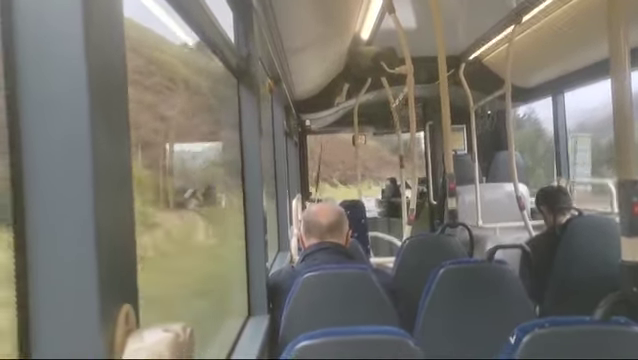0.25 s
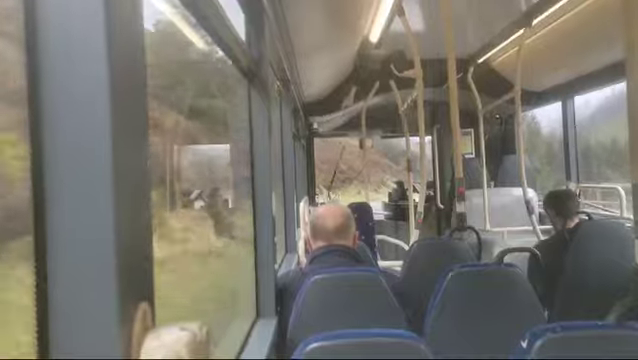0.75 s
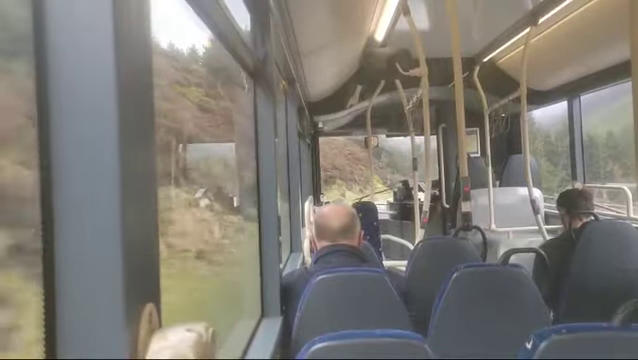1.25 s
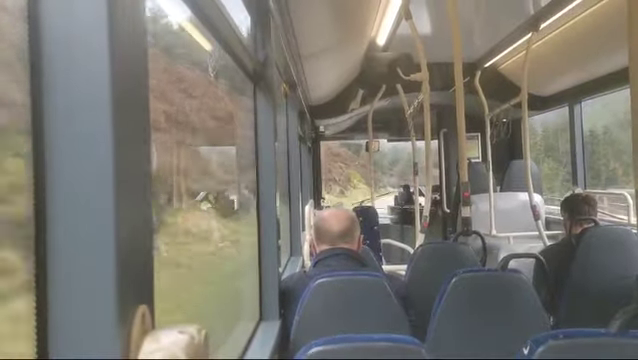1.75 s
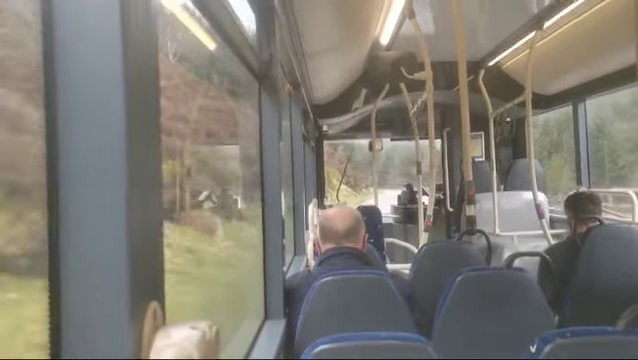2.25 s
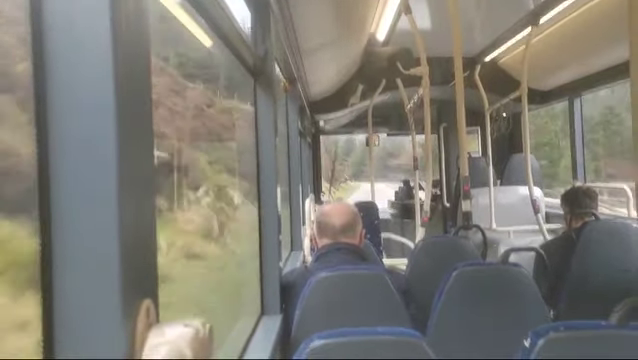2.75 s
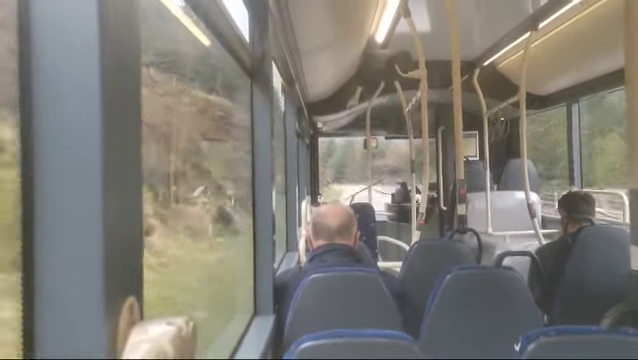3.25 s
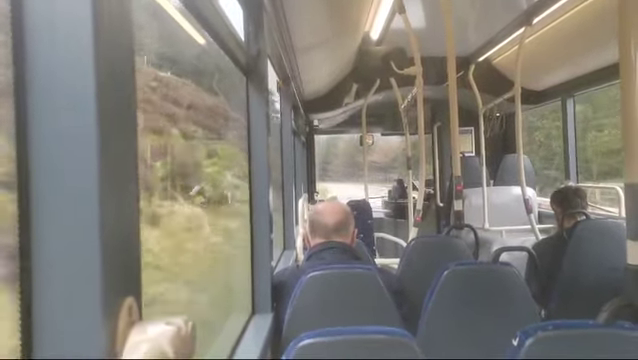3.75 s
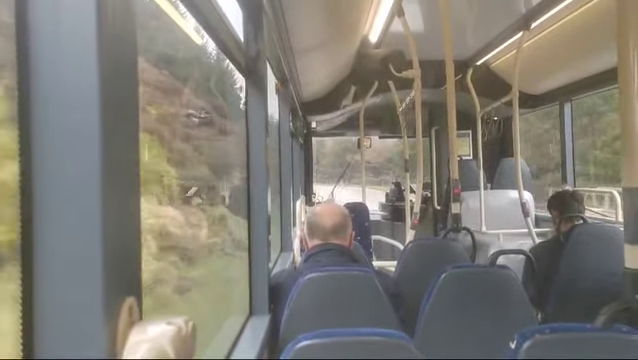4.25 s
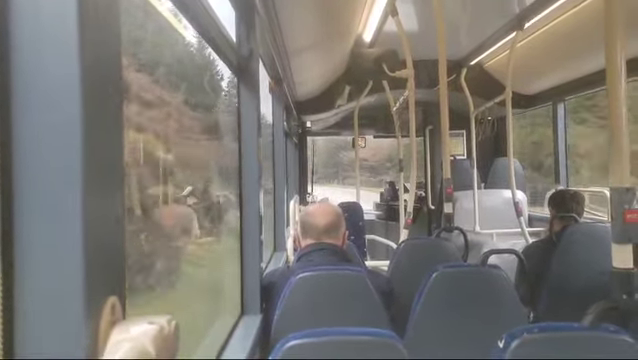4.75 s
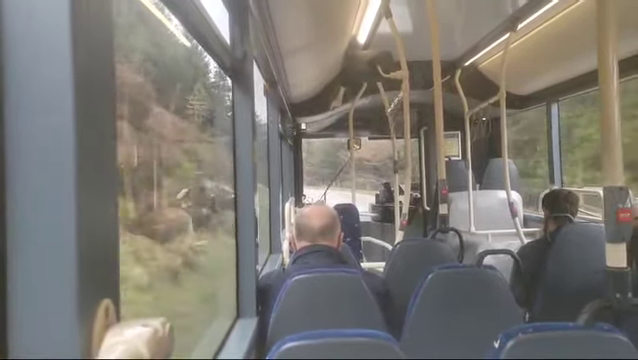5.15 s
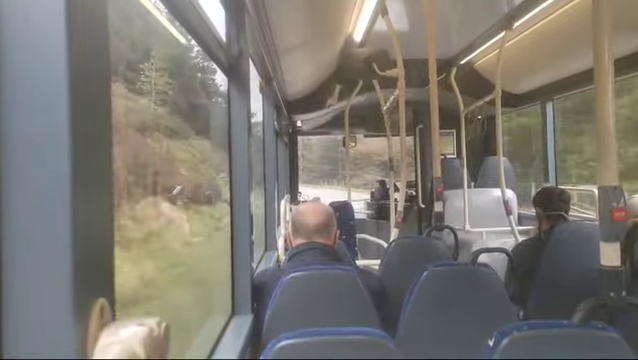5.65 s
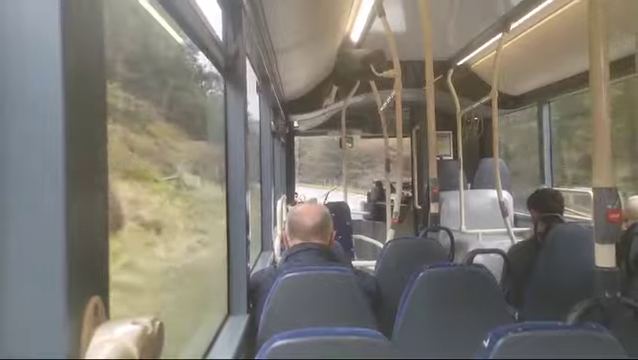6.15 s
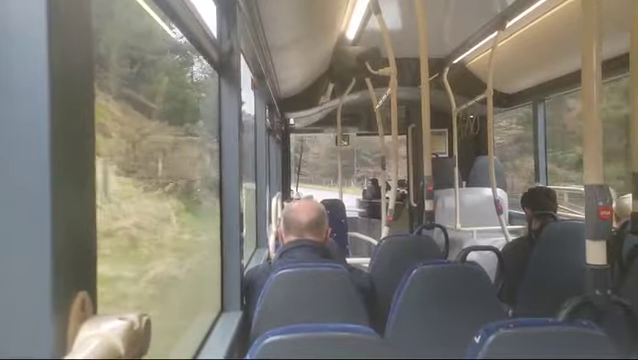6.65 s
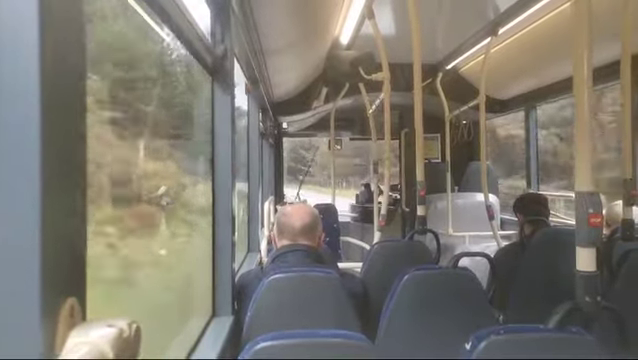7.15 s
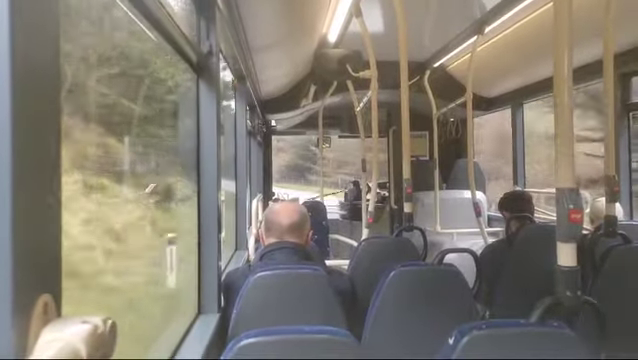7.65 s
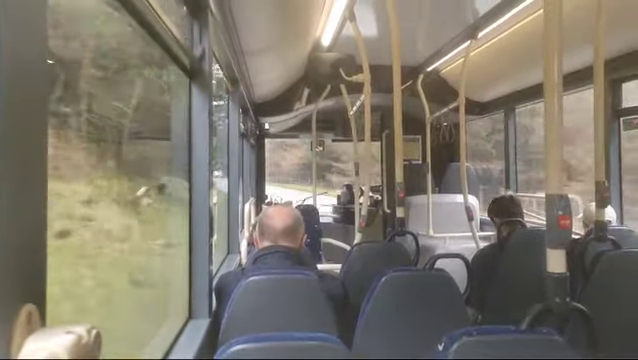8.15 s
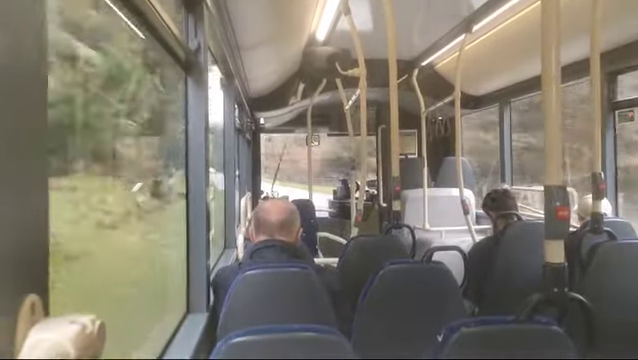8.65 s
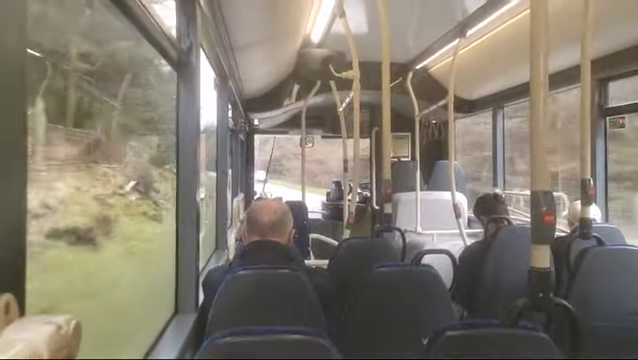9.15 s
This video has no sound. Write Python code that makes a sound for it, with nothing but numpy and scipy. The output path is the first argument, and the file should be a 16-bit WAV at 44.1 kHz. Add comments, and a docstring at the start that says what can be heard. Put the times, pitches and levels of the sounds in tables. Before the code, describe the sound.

Stereo cabin sound of a bus accelerating on a hill road. Nearly a second of rough tarmac jolts the floor, throws grit and stones at the wheel arches and shakes loose fittings. Then smoother rumble, soft hiss and drone, a faint whistle sweeping up near three seconds, and slowly rising hum and thin whine, with occasional plastic taps, body thuds and late rattles.

```python
"""Inside a bus gathering speed on a hill road, heard as filtered noise, gliding tones and decaying modes.
A rough patch at the start throws stones and grit at the wheel arches and sets the fittings rattling.
The throttle eases, the high gear bites briefly, then load returns: the turbocharger whistles up, the intake opens.
On a level stretch the body shakes less and the engine's boom stands clear; later come trim taps and more knocks.
Throughout, noise follows speed, load and road, and engine and gear tones rise through cabin resonances."""
import sys
import numpy as np
from scipy import signal
from scipy.fft import rfft, irfft
from scipy.io import wavfile
from scipy.ndimage import uniform_filter1d

SR = 44100
rng = np.random.default_rng(int(sys.argv[2]) if len(sys.argv) > 2 else 0)


def dump(signal):
    """Clip the signal to [-1, 1] and save it as 16-bit WAV at the path in sys.argv[1]."""
    limited = np.clip(np.atleast_2d(signal).T, -1, 1)
    pcm = np.round(limited * 32767).astype(np.int16)
    wavfile.write(sys.argv[1], SR, pcm)


N = 414540
TIME = np.arange(N) / SR
BINS = np.maximum(np.arange(N // 2 + 1) * SR / N, 1)  # Hz

# Noise laws: (dB at cruise, dB per doubling of speed, dB per dB of load, dB per dB of road roughness)
HEAVE_LAW = (-28.5, 12, 0.3, 1)
FLOOR_LAW = (-18, 9, 0.8, 0.86)
WALL_LAW = (-26.5, 8, 0.5, 0.91)
# Resonances of the heaving body, the floor and the side walls.
# Columns: centre_hz, width_hz (between points 3 dB down), relative_level_db
BODY_RESONANCES = [(30, 16, -15), (43.4, 7.9, -3), (63.6, 6.7, -6.5)]
FLOOR_RESONANCES = [(69.5, 18, 2.5), (94.4, 17, 2.5), (110, 14, -8), (129.4, 28.3, -3)]
WALL_RESONANCES = [(159, 21, -3), (183, 18.6, -1.5), (241.7, 21, -10.5)]
# Dips and humps in the road. Columns: start_s, length_s, heave_level_db, floor_thud_level_db (while fully risen)
ROAD_BUMPS = [(0, 0.55, -23.5, -17.5), (0.597, 0.1, -26, -15.5), (2.1, 0.59, -28.5, -24),
              (2.75, .6, -23.5, -21), (5.455, .2, -32.5, -24.5), (7.5, 0.16, -46, -19),
              (8.548, .9, -26, -32)]
BUMP_ATTACK_S, BUMP_DECAY_S = 0.14, 0.2
# Stretch where the body shakes less: middle_s, length_s, change_db
LEVEL_STRETCH = (4.45, 1.72, -3)


def body_rumble(drive, wheel):
    """Forced vibration: road noise excites body, floor and walls; floor and walls swell once a wheel turn."""
    heave_bumps = [(s, length, heave_db) for s, length, heave_db, _ in ROAD_BUMPS]
    thud_bumps = [(s, length, thud_db) for s, length, _, thud_db in ROAD_BUMPS]
    heave_bump_gain = swells(heave_bumps, BUMP_ATTACK_S, BUMP_DECAY_S)
    thud_bump_gain = swells(thud_bumps, BUMP_ATTACK_S, BUMP_DECAY_S)

    heave_gain = np.hypot(undb(driven(HEAVE_LAW, drive)), heave_bump_gain)
    floor_gain = np.hypot(undb(driven(FLOOR_LAW, drive) + 1.0 * wheel), thud_bump_gain)
    wall_gain = undb(driven(WALL_LAW, drive) + 0.39 * wheel)

    heave = heave_gain * even(cabin_noise(resonances(BODY_RESONANCES)))
    floor = floor_gain * even(cabin_noise(resonances(FLOOR_RESONANCES)))
    walls = wall_gain * even(cabin_noise(resonances(WALL_RESONANCES)))
    return undb(stretch(*LEVEL_STRETCH)) * (heave + floor + walls)


# Wheels dropping into dips. Columns: start_s, heave_level_db, floor_thud_level_db (before rise and decay)
WHEEL_THUMPS = [(.265, -31, -12), (0.361, -7.5, -17), (.44, -23, -6.5), (.685, -22, -13),
                (2.216, -25.5, -17.5), (3.151, -8.5, -19), (6.851, -13, -26.5), (7.553, -30, -10)]
# Growth and decay of a thump: rise_s, t60_s
HEAVE_THUMP, FLOOR_THUMP = (0.033, 0.4), (0.015, 0.22)


def thumps():
    """Impulse response: a dip knocks body and floor into their lowest modes, alike at both microphones."""
    out, t = np.zeros(N), TIME[:SR // 2]
    for s, heave_db, thud_db in WHEEL_THUMPS:
        start = int(s * SR)
        parts = (
            (heave_db, BODY_RESONANCES, HEAVE_THUMP),
            (thud_db, FLOOR_RESONANCES, FLOOR_THUMP),
        )
        for db, modes, (rise_s, t60) in parts:
            swing = sum(undb(mode_db) * np.sin(2 * np.pi * (hz * t + rng.random())) for hz, _, mode_db in modes)
            gain = undb(db - 60 * t / t60) * np.minimum(t / rise_s, 1)
            out[start:start + len(t)] += gain * swing
    return out


PANEL_LAW = (-32.5, 6, 0.6, 1)
# Spectrum of the panels. Columns: frequency_hz, relative_density_db
PANEL_SPECTRUM = [(120, -27.5), (200, 5), (270, -2.5), (350, -1.5), (430, -6), (520, -12.5), (700, -16),
                  (1100, -41), (2500, -74.5)]


def panel_noise(drive):
    """Structure-borne sound: the road shakes the panels into broadband noise of wandering level."""
    return undb(driven(PANEL_LAW, drive) + 1.3 * walk(8.1)) * cabin_noise(colour(PANEL_SPECTRUM))


# Engine boom, engine drone, low and high gear whine. Column: order_cycles_per_crank_turn
MAIN_ORDERS = [4, 9, 17.14, 27]
# Cabin resonances each main tone glides through.
# Columns: centre_hz, width_hz (between points 6 dB down), peak_level_db
BOOM_RESONANCES = [(60.9, 1.5, -17.3), (62.2, 1.4, -15.8), (63.2, 1.2, -15.3), (64.8, 2, -11.8),
                   (66.1, 1.2, -16), (72.7, 1, -20)]
DRONE_RESONANCES = [(132, 5.8, -22.5), (135.7, 5.9, -19), (149.7, 8.6, -24)]
LOW_GEAR_RESONANCES = [(240.5, 9, -18), (247, 6, -28), (251.5, 4.5, -30)]
HIGH_GEAR_RESONANCES = [(375.4, 11, -33.2), (390, 6.5, -29), (394.3, 7, -30), (411.3, 8.6, -38),
                        (443, 20, -30), (457, 16, -37), (471, 16, -35.5), (484, 10, -40.5)]
# Each main tone between its resonances: level_db at zero load, slope_db_per_db of load
BOOM, DRONE, LOW_GEAR, HIGH_GEAR = (-31, 0.8), (-46, 1.7), (-51.5, 2.42), (-48.5, 1.5)


def main_tones(speed, load_db):
    """Order tracking: boom, drone and gear meshes keep fixed ratios to the crank and swell at resonances."""
    peak_tables = (BOOM_RESONANCES, DRONE_RESONANCES, LOW_GEAR_RESONANCES, HIGH_GEAR_RESONANCES)
    levels = (BOOM, DRONE, LOW_GEAR, HIGH_GEAR)
    out = 0
    for order, peaks, (base_db, per_load) in zip(MAIN_ORDERS, peak_tables, levels):
        out = out + cabin_tone(order * speed, peaks, base_db, per_load * load_db, waver_db=-0.7, scatter=0.073)
    return out


# Brief whine of the high gear: start_s, length_s, level_db, attack_s, decay_s
GEAR_BITE = (1.14, .16, -41.5, .04, .04)


def gear_bite(speed):
    """Tooth-mesh excitation: the high gear whines briefly as its teeth take up the load."""
    phase = 2 * np.pi * np.cumsum(MAIN_ORDERS[-1] * speed) / SR
    return envelope(*GEAR_BITE) * np.sqrt(2) * np.cos(phase)


# Weaker engine and gear tones. Columns: order_cycles_per_crank_turn, base_level_db (at zero load),
# resonances (centre_hz, width_hz, peak_level_db)
WEAK_ORDERS = [(2.63, -49, [(47.6, 2.6, -21)]), (5.19, -34, [(72, 1.5, -22), (89.5, 2.2, -18)]),
               (6, -37, [(85, 2, -27)]), (7, -35, [(103, 13, -23)]), (8, -29, [(126, 8, -27),
               (141.5, 5, -22.5)]), (10, -38, [(181, 9, -32)]), (12, -38, [(180, 8, -34), (215, 12, -33)]),
               (13, -41, [(237, 12, -33)]), (15, -50, [(234, 15, -39)]), (18, -52, [(313, 30, -42)]),
               (20, -53, [(302, 18, -44)]), (22, -54, [(383, 12, -37.5), (395, 10, -43)]),
               (24, -56, [(350, 20, -47), (392, 16, -44), (436, 16, -43)]), (30, -58, [(437, 16, -44)]),
               (34.28, -55, [(480, 14, -48), (509, 20, -41.3), (545, 30, -52), (590, 14, -48.5)]),
               (36, -64, [(572, 30, -53), (655, 36, -45.5)]), (42, -65, [(650, 55, -49.5), (745, 45, -58)]),
               (48, -65, [(745, 48, -57)]), (51.42, -64, [(757, 36, -50), (843, 40, -53), (870, 20, -52),
               (920, 20, -56)]), (54, -59, [(746, 22, -50), (815, 24, -57)]), (108, -73, [(1873, 35, -55),
               (1930, 30, -51), (1975, 40, -57)])]


def overtones(speed, load_db):
    """Wave scattering: weaker orders waver more at higher pitch, as the swaying cabin scatters short waves."""
    out = 0
    for order, base_db, peaks in WEAK_ORDERS:
        hz = order * speed
        scatter = .35 * np.sqrt(hz.mean() / 2000)
        out = out + cabin_tone(hz, peaks, base_db, load_db, waver_db=1, scatter=scatter)
    return out


# Harmonics of a belt-driven rotor, likely the alternator. Columns: multiple, base_level_db (at zero load),
# resonances (centre_hz, width_hz, peak_level_db)
BELT_HARMONICS = [(3, -74, [(2410, 70, -58), (2550, 45, -51), (2600, 35, -53), (2715, 90, -53)]),
                  (4, -64, [(2865, 70, -51.5), (3072, 55, -50), (3460, 40, -56), (3595, 55, -51)]),
                  (5, -68, [(4520, 130, -57.5)]), (6, -72, [(4480, 200, -63), (4645, 70, -58),
                  (5365, 140, -63)]), (7, -80, [(5330, 160, -60), (5500, 110, -61), (5740, 260, -64)])]
BELT_ORDER, BELT_SLIP = 50.09, .0007  # cycles per crank turn; rms share by which the pitch wanders


def belt_whine(speed, load_db):
    """Harmonic series: the rotor's harmonics share one wandering pitch as the belt slips."""
    hz = BELT_ORDER * speed * (1 + BELT_SLIP * walk(6))
    out = 0
    for multiple, base_db, peaks in BELT_HARMONICS:
        out = out + cabin_tone(multiple * hz, peaks, base_db, load_db, waver_db=1.5, scatter=.4)
    return out


TYRE_LAW = (-44, 15.5, 0.13, 0.79)
# Spectrum of the tyres on tarmac. Columns: frequency_hz, relative_density_db
TYRE_SPECTRUM = [(250, -15.5), (500, -2.5), (750, 1.5), (1050, 2), (1500, -2.5), (2200, -1), (4000, -15),
                 (7000, -27.5), (9500, -51.5)]


def tyre_roar(drive, wheel):
    """Rolling contact noise: a broadband roar rises with speed and roughness and swells with each wheel turn."""
    level_db = driven(TYRE_LAW, drive) + .1 * wheel + 0.76 * walk(15)
    return undb(level_db) * cabin_noise(colour(TYRE_SPECTRUM))


HISS_LAW = (-43, 11, 0.2, 0.56)
# Spectrum of the engine's hiss. Columns: frequency_hz, relative_density_db
HISS_SPECTRUM = [(1200, -19), (1650, -9.5), (1950, -3.5), (2500, -5), (3080, 2), (3700, -3.5), (4400, -3),
                 (5100, -11.5), (6500, -14), (8500, -33), (9500, -52)]
# Brief swells of the hiss. Columns: start_s, length_s, level_db
HISS_BURSTS = [(1.25, 0.43, -48), (8.3, 0.27, -46)]


def engine_hiss(drive, firing, wheel):
    """Amplitude modulation: the engine's hiss pulses lightly with the firings and the wheel turn."""
    gain = np.hypot(undb(driven(HISS_LAW, drive)), swells(HISS_BURSTS, attack=0.1, decay=0.13))
    pulse_db = 0.31 * firing + .5 * wheel + 0.65 * walk(45)
    return gain * undb(pulse_db) * cabin_noise(colour(HISS_SPECTRUM))


INTAKE_LAW = (-51.5, 9, 0.02, 0.87)
# Spectrum of air drawn into the engine. Columns: frequency_hz, relative_density_db
INTAKE_SPECTRUM = [(3000, -21.5), (4400, 1.5), (5400, 4), (6500, -2.5), (7100, 2), (7800, -0.5),
                   (8500, -11.5), (9400, -30), (15000, -45.5)]
INTAKE_OPENS_S, INTAKE_OPENING_S, INTAKE_SHUT_DB = 2.58, 0.4, -3  # start, time to open, change while shut


def intake_noise(drive, firing, wheel):
    """Turbulent flow noise: drawn air pulses with the firings and grows as the intake opens."""
    opening = np.clip((TIME - INTAKE_OPENS_S) / INTAKE_OPENING_S, 0, 1)
    pulse_db = .5 * firing + 0.13 * wheel + 1.0 * walk(22)
    level_db = driven(INTAKE_LAW, drive) + INTAKE_SHUT_DB * (1 - opening) + pulse_db
    return undb(level_db) * cabin_noise(colour(INTAKE_SPECTRUM))


FIZZ_LAW = (-75, 14.5, 1.5, 2)
# Spectrum of the finest hiss. Columns: frequency_hz, relative_density_db
FIZZ_SPECTRUM = [(8800, -31.5), (10000, -10.5), (11400, 0), (12800, -12), (15500, -13)]


def fizz(drive):
    """Flow-noise power law: the finest hiss grows steeply with speed and load as the flow rises."""
    return undb(driven(FIZZ_LAW, drive) + 1.2 * walk(25)) * cabin_noise(colour(FIZZ_SPECTRUM))


# Larger stones striking the wheel arches. Columns: start_s, pitch_hz, level_db
STONE_HITS = [(.095, 3230, -27), (.098, 2090, -24), (.157, 2260, -25), (.2, 2400, -26), (.283, 2280, -24),
              (.321, 3330, -29), (.3875, 2570, -30), (.548, 2110, -30)]
# Ring of a wheel arch. Columns: multiple_of_pitch, relative_level_db, t60_s
ARCH_RING = [(.87, -9, .03), (1, -2, .04), (1.4, -7, 0.02)]


def stones(rise_s=.001):
    """Modal ringing: stones clack on the wheel arches, each at the pitch of the spot that it hits."""
    out, t = np.zeros((2, N)), TIME[:SR // 8]
    contact = 1 - np.exp(-t / rise_s)
    for s, hz, db in STONE_HITS:
        start = int(s * SR)
        modes = [(ratio * hz, mode_db, t60) for ratio, mode_db, t60 in ARCH_RING]
        out[:, start:start + len(t)] += undb(db) * ring(modes, t) * contact
    return out


# Spectrum of the grit. Columns: frequency_hz, relative_density_db
GRIT_SPECTRUM = [(300, -5), (650, -1), (1050, 6), (1600, -1), (2250, 3), (2700, -9), (3400, 0),
                 (5000, -4.5), (8300, -17.5), (9500, -24), (12000, -27), (15500, -32)]
# Splashes of grit. Columns: start_s, length_s, gain_db (applied to grains and wet hiss together)
GRIT_SPLASHES = [(.075, 0.032, -34.5), (.15, 0.081, -34), (.335, 0.022, -39), (.39, 0.015, -35.5),
                 (.455, 0.023, -37), (.53, 0.021, -45), (.6, .12, -54)]


def spray(grains_per_s=320, grain_s=0.0016, grit_db=-4.0, wet_db=-5.0, flutter_db=8.5):
    """Poisson shot noise: grit spatters the wheel arches in many small strikes over an uneven wet hiss."""
    spectrum = colour(GRIT_SPECTRUM)
    out = 0
    # large and small grains strike independently, each in its own band
    for low, high in ((0, 1600), (1600, 3500), (3500, SR)):
        gain = spectrum * (BINS >= low) * (BINS < high)
        share = np.sqrt(np.sum(gain ** 2) / np.sum(spectrum ** 2))
        strike_sizes = undb(2.3 * np.minimum(rng.exponential(size=N), 3))
        strikes = (rng.random(N) < grains_per_s / SR) * strike_sizes
        energy = signal.lfilter([1], [1, -np.exp(-2 / (grain_s * SR))], strikes ** 2)
        grains = undb(grit_db) * unit(np.sqrt(energy))
        wet = undb(wet_db + flutter_db * np.tanh(walk(50)))
        out = out + share * np.hypot(grains, wet) * cabin_noise(gain)
    return swells(GRIT_SPLASHES, attack=0.017, decay=0.071) * out


# Knocks of loose fittings. Columns: start_s, clack_level_db, tick_level_db (before the offsets below)
FITTING_KNOCKS = [(.229, -35, -51), (0.353, -30.5, -47), (.416, -44, -45), (.484, -30.5, -53),
                  (.552, -36, -63), (.635, -32, -55), (.749, -41, -62), (.845, -48.5, -60),
                  (2.369, -53.5, -68.5), (2.469, -55, -67.5), (2.729, -51, -69), (3.04, -42, -64),
                  (3.334, -40, -58), (6.289, -43, -65), (8.409, -35, -62), (8.523, -34, -51),
                  (9.182, -42, -63)]
# Ring of the fittings. Columns: frequency_hz, relative_level_db, t60_s
FITTING_RING = [(3280, 2, .04), (4470, 1.5, .04), (6200, 1, .035), (7340, 0, .035), (8350, -10.5, 0.026)]
# Spectrum of the bright tick. Columns: frequency_hz, relative_density_db
TICK_SPECTRUM = [(5000, -11), (8000, 3.5), (9700, -3), (11500, 0), (13500, -8), (16000, -21)]
CONTACT_RISE_S = 0.0011


def rattles(clack_db=-2.0, tick_db=3, tick_s=0.0088, bounce_s=0.012, bounce=0.34):
    """Impact and rebound: loose fittings strike and bounce once, with a bright tick and a short ring."""
    out, ticks = np.zeros((2, N)), np.zeros(N)
    t = TIME[:SR // 8]
    contact = 1 - np.exp(-t / CONTACT_RISE_S)
    for s, ring_db, bright_db in FITTING_KNOCKS:
        for delay, size in ((0, 1), (bounce_s * rng.uniform(.6, 1.2), bounce)):
            start = int((s + delay) * SR)
            clack = undb(ring_db + clack_db) * ring(FITTING_RING, t)
            tick = undb(bright_db + tick_db) * np.exp(-t / tick_s)
            out[:, start:start + len(t)] += size * clack * contact
            ticks[start:start + len(t)] += size * tick * contact
    return out + ticks * cabin_noise(colour(TICK_SPECTRUM))


# Dry taps of plastic trim. Columns: start_s, level_db
TRIM_TAPS = [(5.337, -19.5), (6.488, -21.5), (6.57, -29), (8.263, -21)]
# Ring of the trim. Columns: frequency_hz, relative_level_db, t60_s
TRIM_RING = [(2980, -4, .016), (3260, -1, .02), (3430, -2, .018), (4120, -11, .01)]


def trim_taps():
    """Heavy damping: each tap excites plastic modes that die within hundredths of a second."""
    out, t = np.zeros((2, N)), TIME[:SR // 8]
    contact = 1 - np.exp(-t / CONTACT_RISE_S)
    for s, db in TRIM_TAPS:
        start = int(s * SR)
        out[:, start:start + len(t)] += undb(db) * ring(TRIM_RING, t) * contact
    return out


TURBO_REST_HZ, TURBO_FULL_HZ = 7500, 15730  # blade tone at zero and at full boost
TURBO_FULL_S, SPOOL_S = 2.7, .92  # time of full boost, time constant of the climb
# Faint whistle and surge: start_s, length_s, nominal_level_db, attack_s, decay_s
WHISTLE_FAINT = (1.2, 2.2, -73, 1.6, 0.9)
WHISTLE_SURGE = (2.3, .72, -56.5, 0.062, .07)


def turbo(spread_hz=170, skirt_hz=600, skirt_db=-7):
    """Blade-passing tone: pitch climbs with boost, smeared by turbulence into a narrow band of noise."""
    boost = np.exp(np.minimum(TIME - TURBO_FULL_S, 0) / SPOOL_S)
    hz = TURBO_REST_HZ + (TURBO_FULL_HZ - TURBO_REST_HZ) * boost
    phase = 2 * np.pi * np.cumsum(hz) / SR
    ports = []
    for _ in range(2):
        core = walk(spread_hz) * np.cos(phase) + walk(spread_hz) * np.sin(phase)
        skirt = undb(skirt_db) * walk(skirt_hz) * np.cos(phase)
        ports.append(core + skirt)
    return np.hypot(envelope(*WHISTLE_FAINT), envelope(*WHISTLE_SURGE)) * np.array(ports)


# Microphone difference in the cabin's diffuse field. Columns: frequency_hz, side_minus_mid_db (of the noises)
STEREO_WIDTH = [(30, -32.5), (65, -41.5), (125, -22.5), (250, -10), (500, -3), (1000, 0.5), (16000, -0.5)]


def cabin_noise(gain):
    """Diffuse-field coherence: long waves reach both microphones alike, short ones differ."""
    mid, side = rfft(rng.standard_normal((2, N)))
    side = side * colour(STEREO_WIDTH)
    both = irfft(gain * np.array([mid + side, mid - side]), N)
    return both / np.std(both.mean(axis=0))


def cabin_tone(hz, peaks, base_db, load_db, waver_db, scatter):
    """Multipath interference: a tone gliding through resonances meets its reflections in the shaking cabin."""
    # a random starting phase keeps the tones out of step, so that together they hum and do not knock
    carrier = np.exp(2j * np.pi * (np.cumsum(hz) / SR + rng.random()))
    # gains change slowly: compute them at every hundredth sample
    slow, hz, load_db = TIME[::100], hz[::100], load_db[::100]
    lowpass = signal.butter(2, 4, fs=SR / 100, output="sos")
    wander = signal.sosfilt(lowpass, rng.standard_normal((5, len(slow))))
    waver, mid_re, mid_im, side_re, side_im = unit(wander)
    gain = np.sqrt(2) * undb(through(hz, peaks, base_db) + load_db)
    mid = undb(waver_db * waver) * (1 + scatter * (mid_re + 1j * mid_im))
    side_db = np.interp(hz.mean(), *np.transpose(STEREO_WIDTH))
    fixed_path = np.exp(2j * np.pi * rng.random())
    side = undb(side_db) * (fixed_path + (side_re + 1j * side_im) / 2) / 2
    ports = (mid + side, mid - side)
    return np.array([(np.interp(TIME, slow, gain * port) * carrier).real for port in ports])


def ring(modes, t):
    """Modal decay: one blow's modes die away, a little different each time and at each microphone."""
    out = 0
    for hz, db, t60 in modes:
        port_hz = hz * rng.normal(1, .02, (2, 1))
        out = out + undb(db - 60 * t / t60) * np.sin(2 * np.pi * port_hz * t)
    return out


def resonances(modes):
    """Resonance response: the powers of steep-sided peaks add to one gain per frequency."""
    power = 0
    for hz, width, db in modes:
        detuning = (BINS / hz - hz / BINS) * hz / width / 2  # about 1 at one width from the centre
        power = power + undb(2 * db) / (1 + detuning ** 2) ** 3
    return np.sqrt(power)


def through(hz, peaks, base_db):
    """Resonant amplification: level in dB of a tone as it glides through resonances."""
    power = undb(base_db) ** 2
    for centre, width, db in peaks:
        power = power + (undb(db) / (1 + (2 * (hz - centre) / width) ** 2)) ** 2
    return 10 * np.log10(power)


EVENNESS, EVEN_OVER_S = .6, .09  # exponent of the levelling, length of the longer smoothing window


def even(noise):
    """Level compression: evenly rolling wheels keep the noise's fast flutter but swell and sag less."""
    size = int(EVEN_OVER_S * SR)
    power = uniform_filter1d(uniform_filter1d(noise.mean(axis=0) ** 2, size), size // 2)
    return unit(noise / power ** (EVENNESS / 2))


def driven(law, drive):
    """Power-law scaling: level in dB of a noise from speed, load and road roughness."""
    cruise_db, *slopes = law
    return cruise_db + sum(slope * control for slope, control in zip(slopes, drive))


def stretch(middle, length, db, edge_s=0.12):
    """Gradual excitation: change in dB as the wheels roll on and off a stretch of road."""
    return db / 2 * (1 + np.tanh((length / 2 - abs(TIME - middle)) / (2 * edge_s)))


# Rough stretches of tarmac. Columns: middle_s, length_s, extra_roughness_db (nominal, before the soft edges)
ROUGH_TARMAC = [(0.18, 0.95, 12), (2.804, 0.86, 1.5), (7.61, 0.57, 1)]


def roughness():
    """Surface excitation: extra roughness in dB on the rough stretches."""
    return sum(stretch(*row) for row in ROUGH_TARMAC)


def envelope(start, length, db, attack, decay):
    """Transient envelope: gain rises, holds until its length is over and dies away exponentially."""
    age = TIME - start
    return undb(db) * np.clip(age / attack, 0, 1) * np.exp(-np.maximum(age - length, 0) / decay)


def swells(events, attack, decay):
    """Energy summation: joint gain of (start_s, length_s, level_db) events with one attack and decay."""
    return np.sqrt(sum(envelope(*event, attack, decay) ** 2 for event in events))


def walk(rate):
    """Gaussian low-pass noise: a smooth random wander of rms 1, its bandwidth set by rate in Hz."""
    return unit(irfft(rfft(rng.standard_normal(N)) * np.exp(-(BINS / rate) ** 2), N))


def colour(points):
    """Spectral shaping: gain per frequency, interpolated in dB over log frequency."""
    hz, db = np.transpose(points)
    return undb(np.interp(np.log(BINS), np.log(hz), db))


def undb(db):
    """Logarithmic level: decibels to amplitude gain."""
    return 10 ** (np.asarray(db) / 20)


def unit(x):
    """Root-mean-square normalisation: scale to rms 1."""
    return x / np.sqrt(np.mean(x ** 2))


def curves(table):
    """Linear interpolation: each column of a table as a value per sample."""
    s, *columns = np.transpose(table)
    return [np.interp(TIME, s, c) for c in columns]


# Engine speed. Columns: time_s, crank_turns_per_s
CRANK_SPEED = [(0, 13.85), (.9, 13.68), (1.25, 13.82), (1.5, 13.6), (1.9, 13.7), (2.4, 13.88), (3.5, 14.54),
               (5, 15.525), (6.6, 16.61), (7.5, 17.21), (8.3, 17.73), (9.4, 18.41)]
# Drivetrain load as the throttle eases and opens again. Columns: time_s, load_db
DRIVE_LOAD = [(0, -6), (.9, -8.5), (1.5, -5), (2.4, -1.77), (3.4, -1), (9.4, 0.5)]
CRUISE_TURNS_PER_S, CRANK_TURNS_PER_WHEEL_TURN = 16, 4.75


def scene():
    """Superposition: the crank drives tones and wheels; speed, load and road surface set the noises."""
    speed, = curves(CRANK_SPEED)
    load_db, = curves(DRIVE_LOAD)
    drive = (np.log2(speed / CRUISE_TURNS_PER_S), load_db, roughness())
    turns = np.cumsum(speed) / SR
    wheel = np.sin(2 * np.pi * turns / CRANK_TURNS_PER_WHEEL_TURN)
    firing = np.cos(2 * np.pi * 2 * turns)  # two firings a crank turn

    road = body_rumble(drive, wheel) + thumps() + panel_noise(drive) + tyre_roar(drive, wheel)
    tones = main_tones(speed, load_db) + gear_bite(speed) + overtones(speed, load_db) + belt_whine(speed, load_db)
    flow = engine_hiss(drive, firing, wheel) + intake_noise(drive, firing, wheel) + fizz(drive)
    impacts = stones() + spray() + rattles() + trim_taps()
    return road + tones + flow + impacts + turbo()


# Colour of the microphone pair. Columns: frequency_hz, left_minus_right_db
PORT_BALANCE = [(60, -0.9), (125, 2), (300, -0.5), (1200, 0.5), (2000, -2.5), (4400, -4.5), (5600, 0),
                (7600, -1), (8600, 14.5), (9300, 3), (10000, -9), (12500, -12), (14000, -6)]
TOP_HZ = 15800


def record(dry):
    """Linear filtering: each microphone port has its own colour, and the top is cut steeply."""
    lean = np.sqrt(colour(PORT_BALANCE))  # half the difference goes to each port
    fade = np.minimum(np.minimum(TIME, TIME[::-1]) / .004, 1)
    ports = irfft(rfft(dry * fade) * np.array([lean, 1 / lean]), N)
    return signal.sosfilt(signal.ellip(10, .2, 70, TOP_HZ, fs=SR, output="sos"), ports)


dry = scene()
out = record(dry)
dump(out)
```